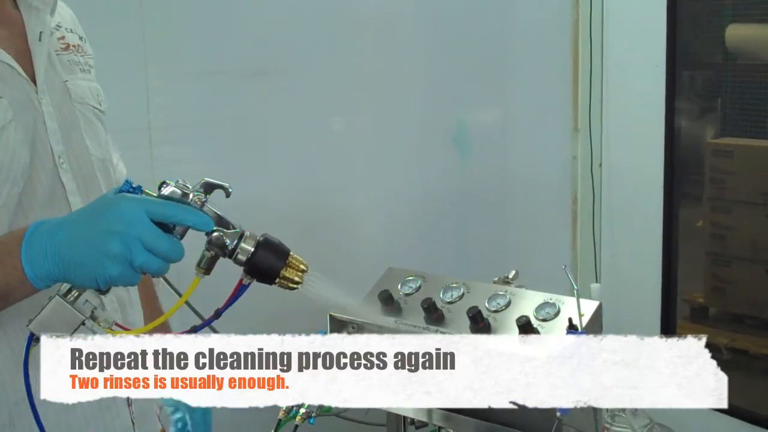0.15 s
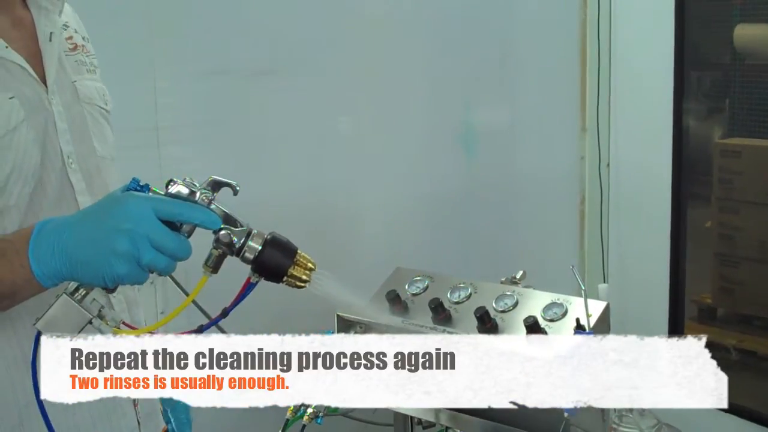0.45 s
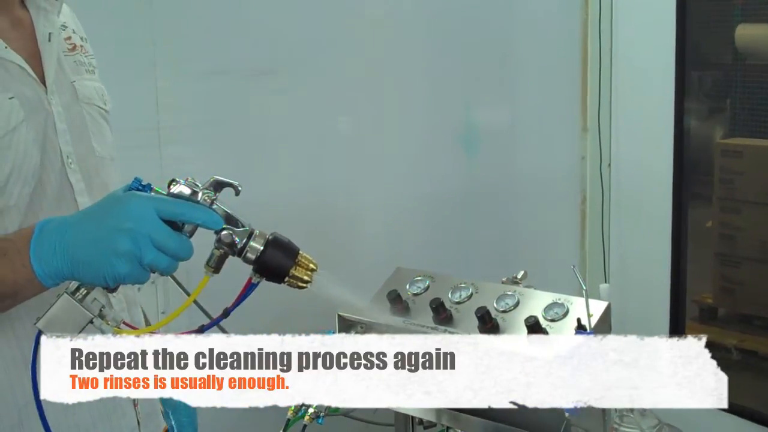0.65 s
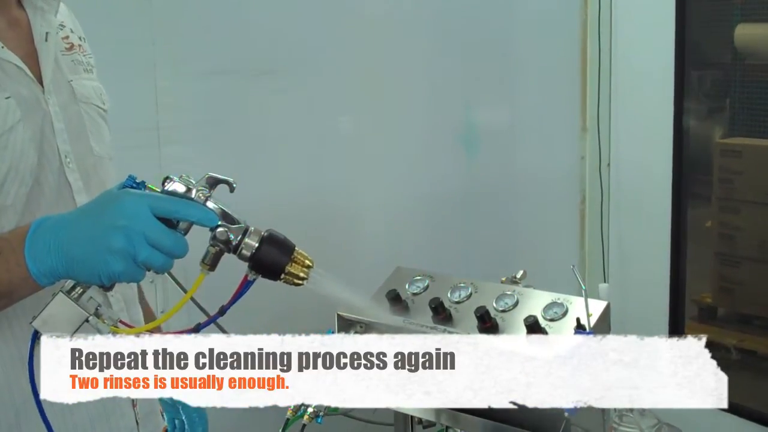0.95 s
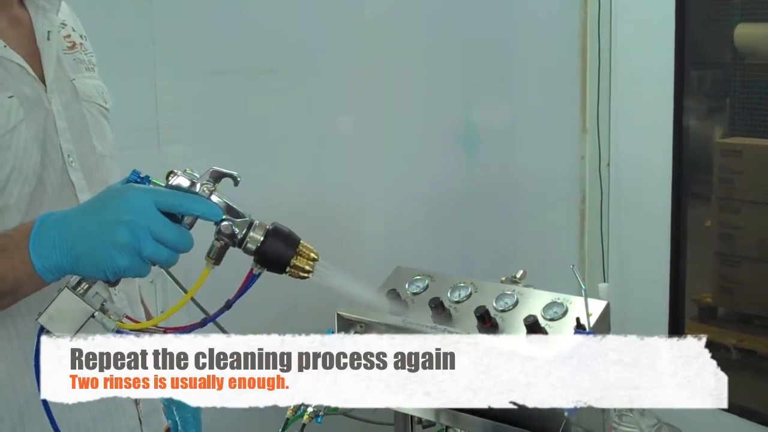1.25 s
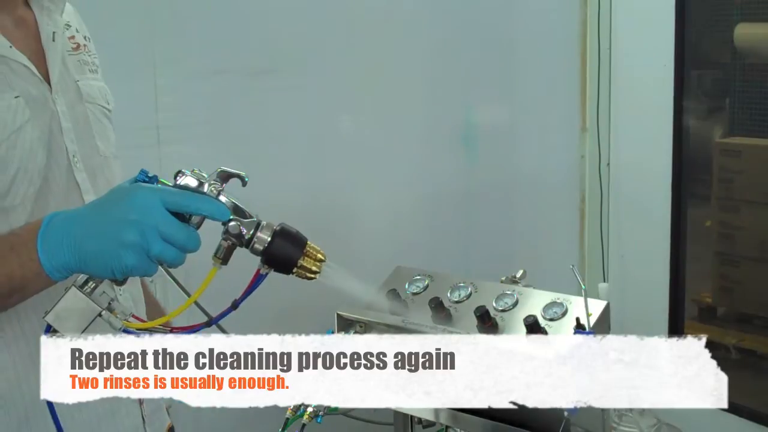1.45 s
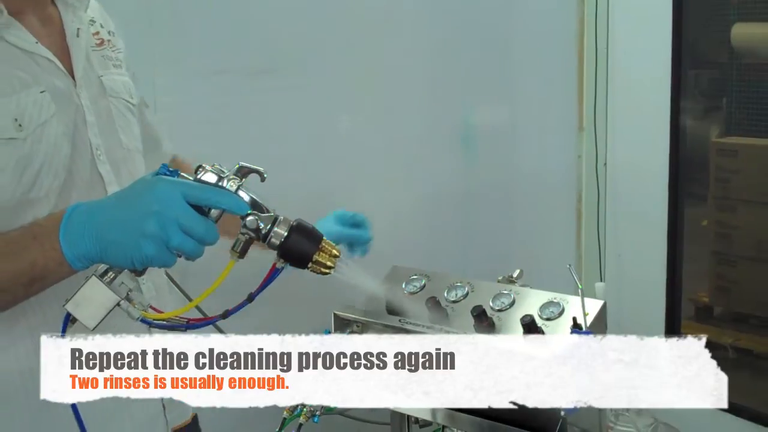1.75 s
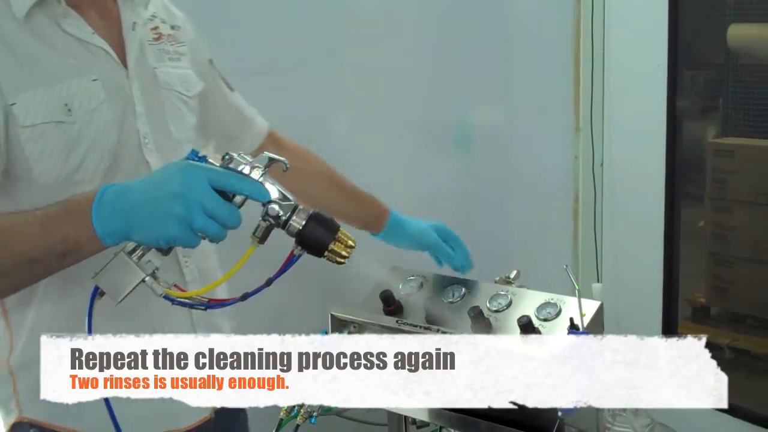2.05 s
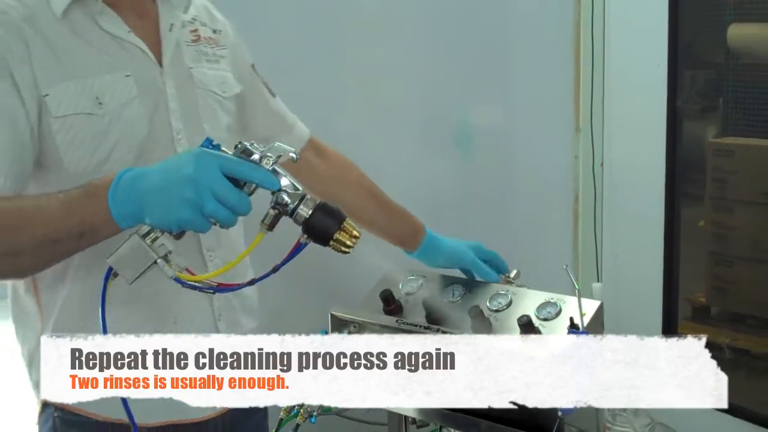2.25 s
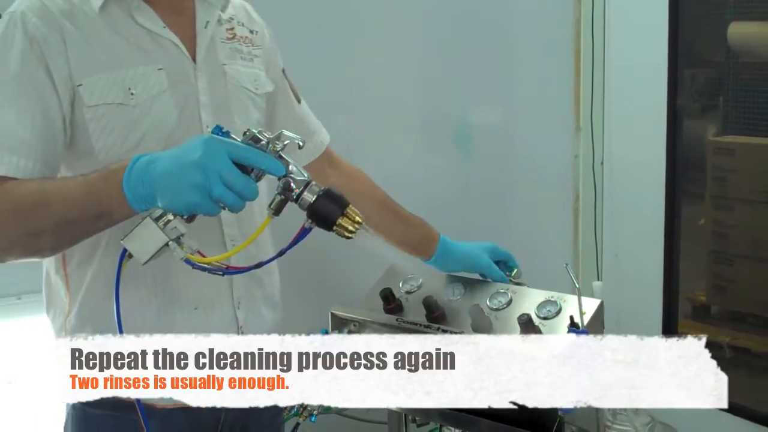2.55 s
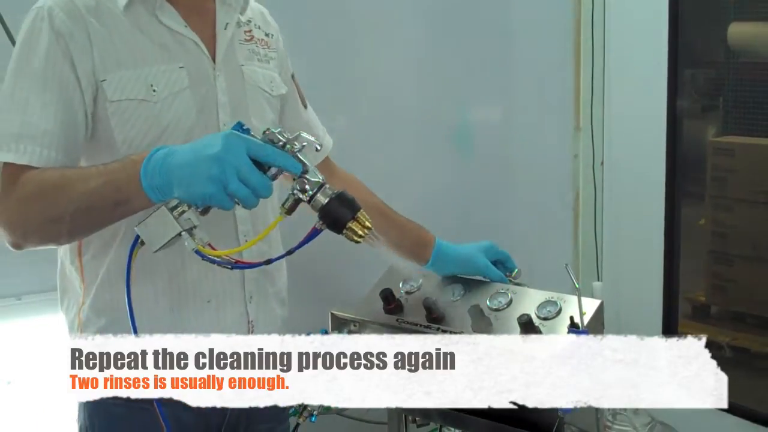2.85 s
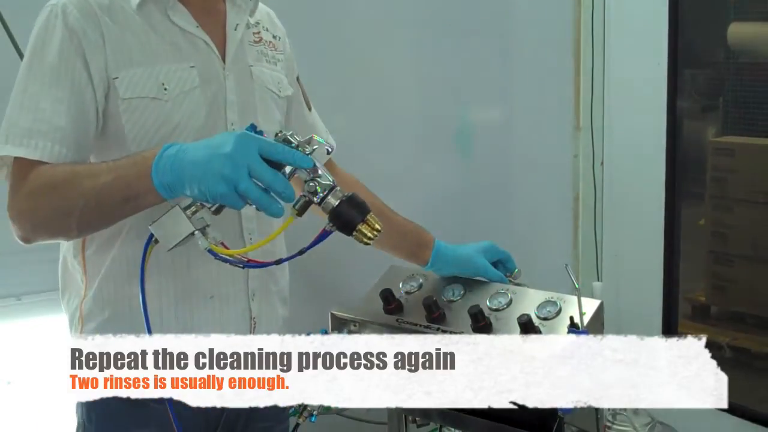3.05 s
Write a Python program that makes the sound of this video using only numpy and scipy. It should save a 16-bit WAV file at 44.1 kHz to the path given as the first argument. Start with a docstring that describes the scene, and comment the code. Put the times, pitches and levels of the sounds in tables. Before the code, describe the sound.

A spray gun gives a soft, airy hiss until about 0.47 seconds, then snaps into a loud blast of air and fine water. The start is strongest; it settles into a bright, slightly uneven rush with faint whistling and a hollow hum near 0.95-1.2, and surges briefly around 1.96. At 2.93 it cuts off abruptly, leaving a short hard-walled booth tail over faint rumble. Close stereo pickup, barely audible low bumps.

```python
"""A spray gun blasts air and water into a vessel in a hard-walled booth: shaped noise with droplet clicks.
The vessel hums near one hollow note, noise through a narrow resonance; soft air hiss precedes the blast.
When the trigger is let go the booth rings out, in tails of sparse taps, over a faint room rumble.
Two close microphone ports pick it all up, along with a few soft low bumps."""
import sys
import numpy as np
from scipy import signal
from scipy.fft import rfft, irfft, next_fast_len
from scipy.io import wavfile
from scipy.ndimage import uniform_filter1d

SR = 44100
rng = np.random.default_rng(int(sys.argv[2]) if len(sys.argv) > 2 else 0)


def bounce(signal):
    """Save signal as a 16-bit WAV file at the path given by the first command-line argument."""
    frames = np.transpose(np.atleast_2d(signal))
    limited = np.clip(frames, -1, 1)
    pcm = np.round(limited * 32767).astype(np.int16)
    wavfile.write(sys.argv[1], SR, pcm)


def gain_from_db(level_db):
    """Convert decibel levels to linear amplitude factors (20 dB per decade)."""
    decades = np.asarray(level_db, float) / 20
    return 10 ** decades


N = 141120  # samples, 3.2 s

# the blast over time: [t/s, level/dB, slope above the pivot/dB per octave, slope below it/dB per octave]
BLAST_COURSE = [(.475, -19.5, -2.5, 2.5), (.51, -20.5, -3.5, 3.5), (.545, -25.5, 0, 1),
                (.59, -24.5, -0.5, 1), (.66, -29.5, 1.5, 0.5), (.72, -22.5, -2, 1), (.77, -25, 0, -.5),
                (.83, -26.5, 1, 0), (1.1, -26, -0.5, 0.5), (1.4, -27, 0.5, 1), (1.6, -27, 1, .5),
                (1.91, -26, 1, 0), (1.96, -23.5, -.5, 1), (2.01, -28.5, 2, -1.5), (2.08, -27.5, 2.5, 2),
                (2.18, -26.5, 2, -2.5), (2.23, -29.5, 2, 1.5), (2.4, -28.5, 1, .5), (2.55, -29, .5, 0.5),
                (2.8, -26.5, 0, .5), (2.92, -28, 2, 0.5)]
# spectrum of the blast: [f/Hz, relative level per Hz/dB]
BLAST_SPECTRUM = [(40, -45), (100, -35), (250, -25), (330, -19), (460, -14), (600, -8.5), (950, -6),
                  (1250, -6.5), (1600, -5.5), (2500, -3), (4000, -2), (6000, -4.5), (9200, -4),
                  (10500, -12), (11600, -15.5), (13000, -18.5), (14500, -22.5)]
# faint resonances that the jet excites while the gun points one way:
# [f/Hz, width/Hz, gain against the jet/dB, from t/s, to t/s]
JET_RESONANCES = [(686, 30, 0.5, 0.56, 1.85), (880, 120, -4.5, 0.4, 1.26), (1076, 18, -4, 2.2, 3.2),
                  (1534, 17, 4.5, 0.46, 1.8), (1733, 25, -6, 0.33, 1.5), (2050, 13, -17, 0.56, 2.3),
                  (2710, 25, -18, 1.76, 2.7), (3430, 24, -2, .9, 1.7), (3960, 21, -10, 0.34, 2.5),
                  (4060, 28, 3, 1.13, 1.64), (4120, 21, -2, 2.4, 3.4), (5140, 27, 6, 1.9, 3),
                  (7100, 43, -3.5, 2.2, 8), (7000, 46, -2, 0.61, 1.8), (8000, 40, -2.5, 0.49, 2.2)]
# hollow note of the vessel: [t/s, f/Hz, level/dB]
HOLLOW_NOTE = [(.48, 522, -54), (.8, 530, -54), (.95, 528, -40), (1.15, 533, -40), (1.5, 519, -45),
               (1.65, 529, -48), (1.74, 510, -43), (1.85, 520, -51.5), (2.05, 519, -42.5),
               (2.3, 514, -50.5), (2.8, 503, -48), (2.92, 509, -47)]
# air alone before the blast: [t/s, level/dB]
AIR_COURSE = [(0.0, -38), (0.18, -39.5), (0.43, -37), (0.46, -34)]
# spectrum of the air hiss: [f/Hz, relative level per Hz/dB]
AIR_SPECTRUM = [(100, -20.5), (300, -18), (420, -13), (500, -11), (980, -5.5), (2100, -3), (3000, -2),
                (4400, -4), (6000, -6), (9500, -8), (11600, -19), (14500, -23)]
# decay of the booth: [f/Hz, time to fall 60 dB/s]
BOOTH_DECAY = [(250, 0.57), (1000, 0.47), (4000, 0.35), (9000, 0.21), (14000, 0.25)]
# spectrum of the room rumble: [f/Hz, relative level per Hz/dB]
RUMBLE_SPECTRUM = [(20, -16), (45, -28), (100, -10), (135, -21), (180, -25), (400, -17.5), (850, -25),
                   (2700, -22.5), (6000, -30), (12000, -38)]
# soft low bumps on the microphone: [t/s, envelope peak level/dB]
MIC_BUMPS = [(.49, -60), (.55, -63), (.84, -65), (2.22, -61), (2.71, -63)]
# the two microphone ports: [f/Hz, likeness 0-1, phase by which left leads/rad, left minus right level/dB]
MIC_PORTS = [(25.2, 0.1, -0.5, 0), (60, 0.83, 0.5, -2), (199, 1, -1.5, 0.5), (694, 0.97, 0, -0.5),
             (1300, 0.85, 0, .5), (2300, 0.9, 0.5, 0.5), (3500, 0.72, 0.5, .5), (4850, 0.24, -0.5, 0),
             (6500, 0.32, 1.3, -1), (8000, .2, .8, -4.5), (9700, 0.5, 2, -6), (10800, 0, 4, -1),
             (11800, 0.74, 3.5, 4), (13000, 0, 2, 4), (14300, 0.1, 4, 15)]

OPEN_S, OPEN_RISE_S = 0.4705, 0.007
SHUT_S, SHUT_DB_PER_S = 2.929, 464
DROPS_PER_S, DROPS_DB, DROP_SPREAD_DB = 3000, -10, 2.8  # level is against the steady jet noise
PATCH_DB, FLICKER_DB = 1.1, 0.45  # unevenness of the blast, rms
RING_FADE_S = 0.08
HOLLOW_WIDTH_HZ = 52  # of each of two passes
BOOTH_DB, RUMBLE_DB = -6.5, -63.5
BUMP_HZ, BUMP_S = 34, 0.018
PIVOT_HZ, SOFTEN_HZ = 4200, 300  # the moving slopes turn here; softening flattens them in the lows
AIR_LIKENESS_POWER = 0.52  # below 1: the air hiss is more alike in both ports than the blast
EDGE_HZ = 14230  # band limit


def trigger():
    """Flow through the valve: snaps open, dies quickly when let go."""
    t = np.arange(N) / SR
    opening = np.clip((t - OPEN_S) / OPEN_RISE_S, 0, 1)
    return opening * gain_from_db(-SHUT_DB_PER_S * np.maximum(t - SHUT_S, 0))


def droplets():
    """Bursting droplets: single-sample clicks at random moments, of random sign and strength."""
    clicks = (rng.random(N) < DROPS_PER_S / SR) * rng.choice([-1., 1.], N)
    strength_db = DROP_SPREAD_DB * np.minimum(rng.exponential(1, N), 5)
    return evened(clicks * gain_from_db(strength_db))


def blast():
    """Turbulent jet noise with bursting droplets, tinged by faint resonances."""
    t = np.arange(N) / SR
    drive = rng.standard_normal(N) + gain_from_db(DROPS_DB) * droplets()
    above_db, below_db = along(BLAST_COURSE, column=2), along(BLAST_COURSE, column=3)
    jet = coloured(drive, BLAST_SPECTRUM, above_db, below_db, PATCH_DB, FLICKER_DB)
    rings = np.zeros(N)
    for hz, width_hz, gain_db, start_s, end_s in JET_RESONANCES:
        inside_s = np.minimum(t - start_s, end_s - t)
        fade = np.clip(inside_s / RING_FADE_S + 0.5, 0, 1)
        rings += gain_from_db(gain_db) * fade * resonate(jet, hz, width_hz)
    return gain_from_db(along(BLAST_COURSE, column=1)) * trigger() * evened(jet + rings)


def hollow():
    """The jet excites the air in the vessel: noise passed twice through one narrow, drifting resonance."""
    hz = along(HOLLOW_NOTE, column=1)
    once = resonate(rng.standard_normal(N), hz, HOLLOW_WIDTH_HZ)
    note = resonate(once, hz, HOLLOW_WIDTH_HZ)
    return gain_from_db(along(HOLLOW_NOTE, column=2)) * trigger() * evened(note)


def air():
    """Soft hiss of air, shaped noise that the blast takes over from."""
    fade = gain_from_db(-200 * np.maximum(np.arange(N) / SR - OPEN_S, 0))  # 200 dB per s
    hiss = coloured(rng.standard_normal(N), AIR_SPECTRUM, patch_db=1.0)
    return gain_from_db(along(AIR_COURSE, column=1)) * fade * hiss


def booth(x, start_s=0.004):
    """Hard walls: two unrelated tails of sparse taps, each band dying at its own speed."""
    taps = np.zeros((2, SR))
    at = np.arange(int(start_s * SR), SR - 20, 20)  # one tap in every 20 samples
    at = at + rng.integers(0, 20, (2, len(at)))
    np.put_along_axis(taps, at, rng.choice([-1., 1.], at.shape), axis=1)
    hz, t, z = signal.stft(taps, SR, nperseg=256)
    decay = gain_from_db(-60 * t / read(BOOTH_DECAY, hz)[:, None])
    tail = signal.istft(z * decay, SR, nperseg=256)[1]
    return signal.fftconvolve(x[None], tail / np.linalg.norm(tail[0]), axes=1)[:, :N]


def bumps():
    """Soft pushes on the microphone: short low sines under a bell curve, each at a random phase."""
    t = np.arange(N) / SR
    total = np.zeros(N)
    for at_s, peak_db in MIC_BUMPS:
        bell = np.exp(-((t - at_s) / BUMP_S) ** 2)
        total += gain_from_db(peak_db) * bell * np.sin(2 * np.pi * (BUMP_HZ * (t - at_s) + rng.random()))
    return total


def rumble():
    """Faint rumble of the room: steady noise with a low-weighted, patchy spectrum."""
    return gain_from_db(RUMBLE_DB) * coloured(rng.standard_normal(N), RUMBLE_SPECTRUM, patch_db=3.0)


def coloured(x, tone, above_db=0., below_db=0., patch_db=0., flicker_db=0.):
    """Gives x a spectrum, moving slopes, drifting patches and a flicker shared by all bands, at rms 1."""
    hz, t, z = signal.stft(x, SR, nperseg=1024, noverlap=768)
    patches = uniform_filter1d(rng.standard_normal(z.shape), size=10, axis=0)
    patches = evened(uniform_filter1d(patches, size=14, axis=1))
    flicker = evened(uniform_filter1d(rng.standard_normal(len(t)), size=6))
    octaves = np.log2((hz[:, None] + SOFTEN_HZ) / (PIVOT_HZ + SOFTEN_HZ))
    above, below = (np.interp(t, np.arange(N) / SR, v * np.ones(N)) for v in (above_db, below_db))
    tilt = above * np.maximum(octaves, 0) + below * np.minimum(octaves, 0)
    gain_db = read(tone, hz)[:, None] + tilt + patch_db * patches + flicker_db * flicker
    return evened(signal.istft(z * gain_from_db(gain_db), SR, nperseg=1024, noverlap=768)[1][:N])


def resonate(x, hz, width_hz):
    """One resonance of gain 1 that may follow a curve: shift its pitch to 0 Hz, smooth, shift back."""
    turn = np.exp(2j * np.pi * np.cumsum(hz * np.ones(N)) / SR)
    r = np.exp(-np.pi * width_hz / SR)
    return 2 * (turn * signal.lfilter([1 - r], [1, -r], x / turn)).real


def evened(x):
    """Scales to rms 1."""
    return x / np.sqrt(np.mean(x ** 2) + 1e-20)


def read(points, hz):
    """Reads a table on a log-frequency axis."""
    f, value = np.transpose(points)
    return np.interp(np.log(hz + 1), np.log(f + 1), value)


def along(table, column):
    """One column of a curve at every sample."""
    rows = np.array(table)
    return np.interp(np.arange(N) / SR, rows[:, 0], rows[:, column])


def ports(a, b, power=0.98):
    """Two close microphone ports: the right shares part of the left field, the rest is unrelated."""
    size = next_fast_len(N + 4096)
    hz, rows = np.fft.rfftfreq(size, 1 / SR), np.array(MIC_PORTS)
    same, phase, lean_db = (read(rows[:, [0, k]], hz) for k in (1, 2, 3))
    same = np.clip(same, 0, 0.99) ** power
    lean = gain_from_db(lean_db / 2)
    # level of the left-right average, divided out so that it keeps the source's spectrum
    middle = np.sqrt(lean ** 2 + lean ** -2 + 2 * same * np.cos(phase)) / 2
    za, zb = rfft(a, size), rfft(b, size)
    left = lean * za
    right = (same * np.exp(-1j * phase) * za + np.sqrt(1 - same ** 2) * zb) / lean
    return irfft(np.array([left, right]) / middle, size)[:, :N]


def scene():
    """Gun, booth, rumble and bumps, reaching the ports as pairs of unrelated fields."""
    near, far = [], []
    for side in range(2):
        hiss, gun = air(), blast() + hollow()
        reverb = gain_from_db(BOOTH_DB) * booth(gun + hiss)[side]
        near.append(hiss)
        far.append(gun + reverb + rumble() + bumps())
    return ports(*near, AIR_LIKENESS_POWER) + ports(*far)


def band_limit(x):
    """A steep low-pass at the top of the band."""
    return signal.sosfilt(signal.butter(12, 14510, fs=SR, output="sos"), x)


def record(dry):
    """Limits the band with a steep low-pass and returns the finished mix as stored."""
    lowpass = signal.firwin(511, EDGE_HZ, window=("kaiser", 9), fs=SR)
    mix = signal.oaconvolve(dry, lowpass[None], "same")
    return band_limit(mix)


dry = scene()
out = record(dry)
bounce(out)
```